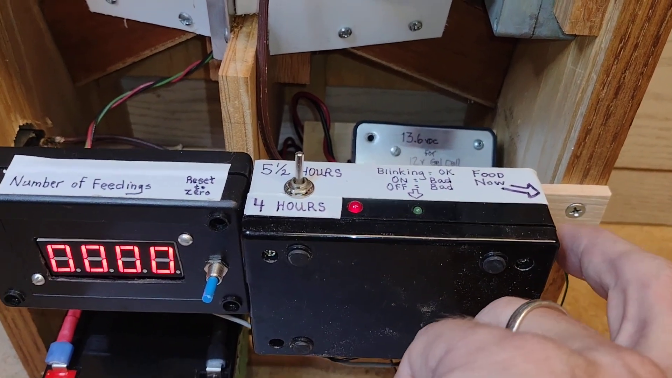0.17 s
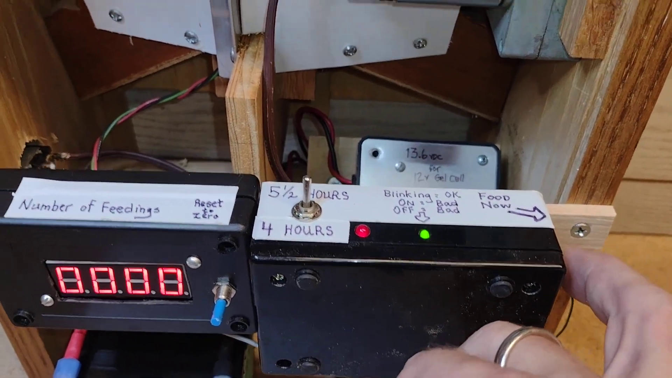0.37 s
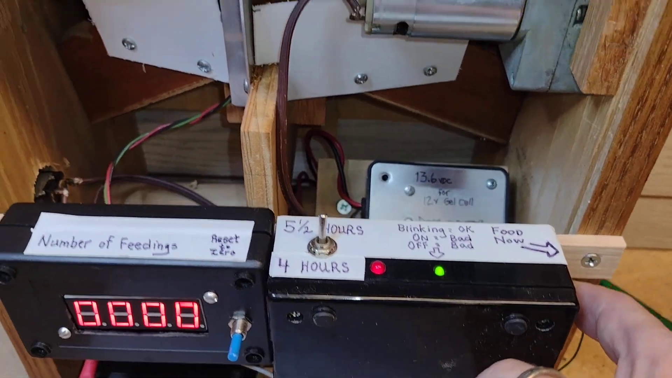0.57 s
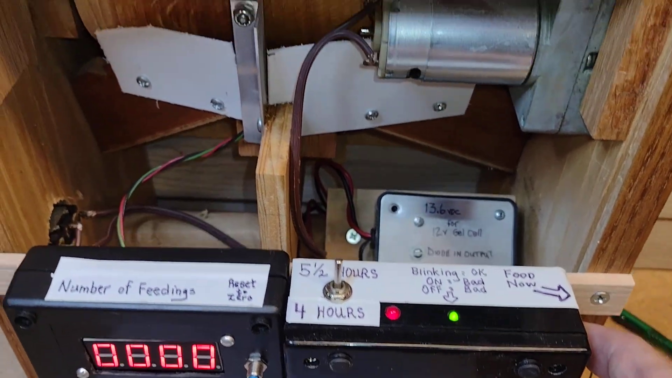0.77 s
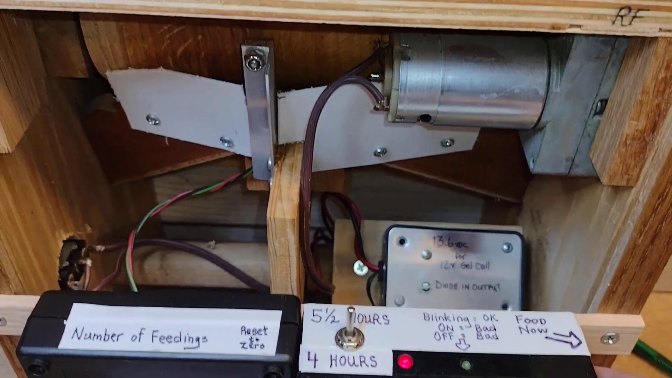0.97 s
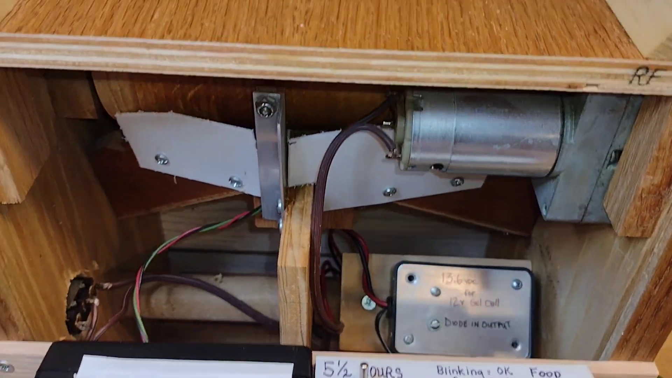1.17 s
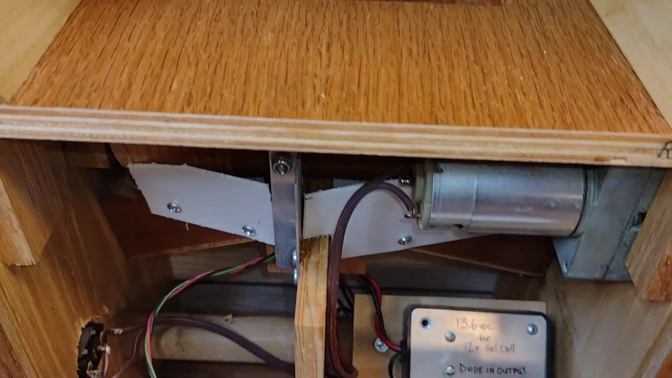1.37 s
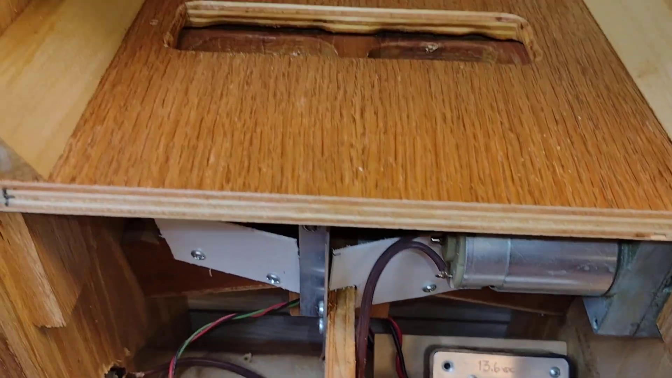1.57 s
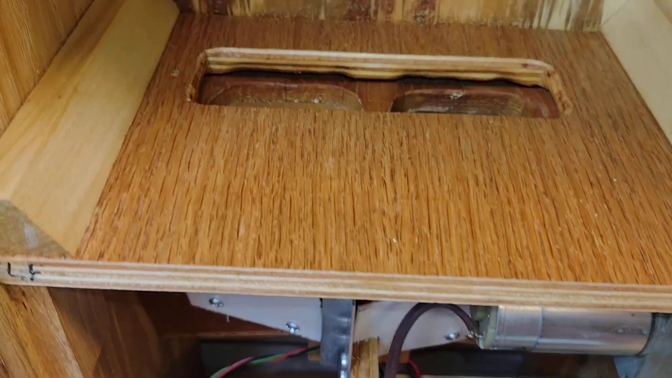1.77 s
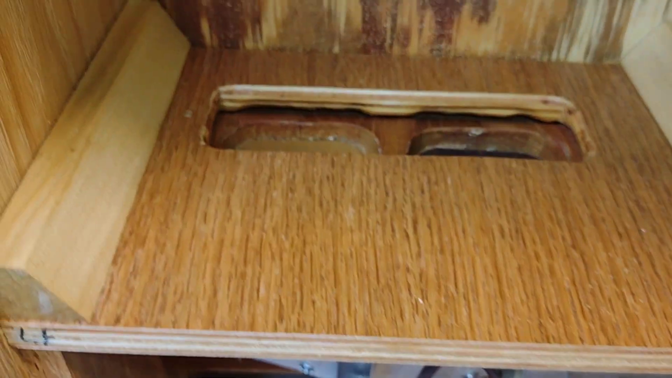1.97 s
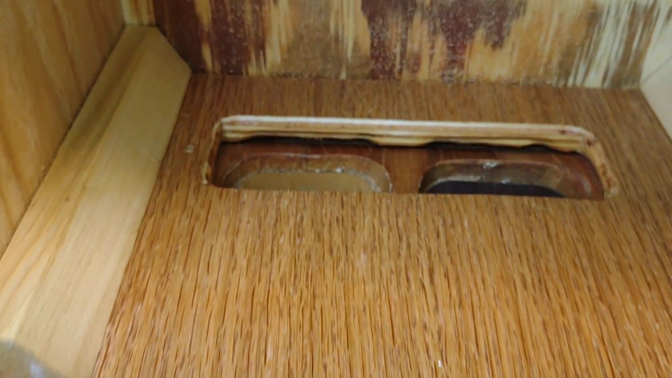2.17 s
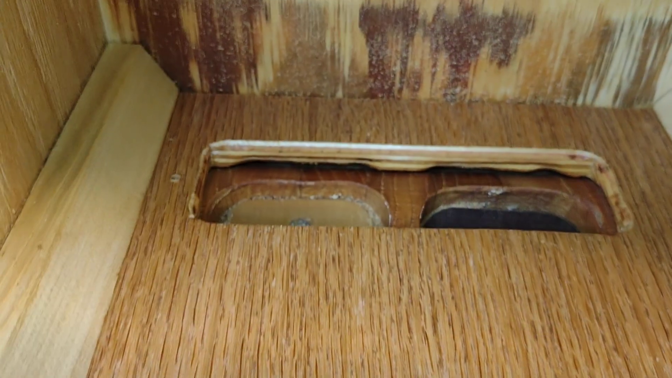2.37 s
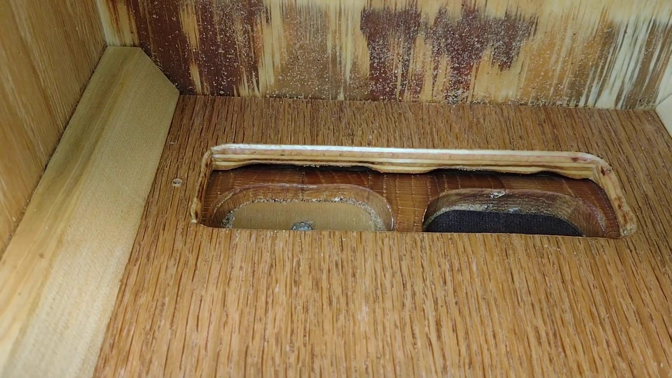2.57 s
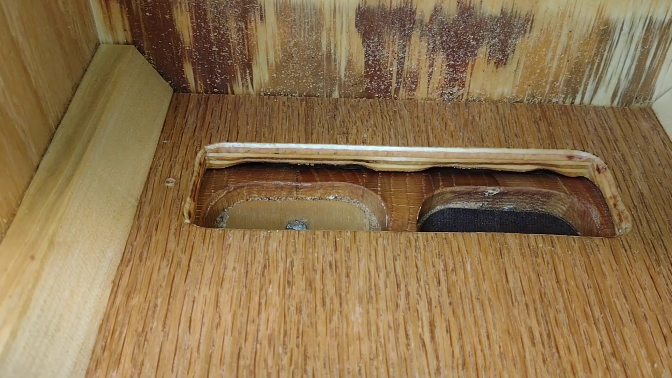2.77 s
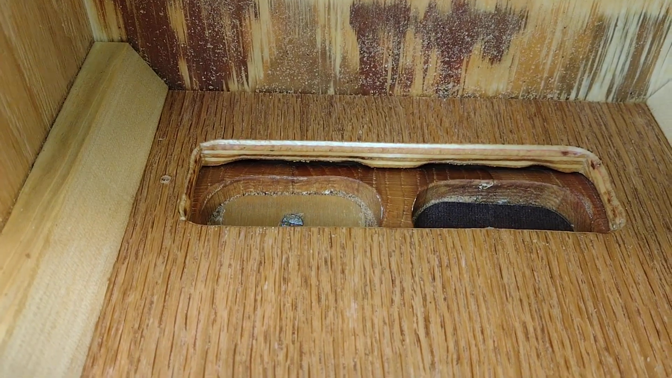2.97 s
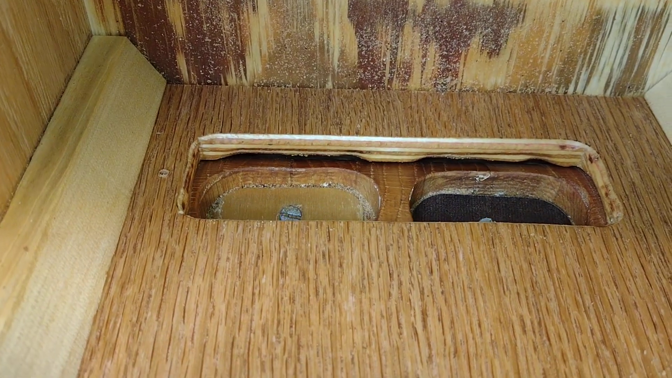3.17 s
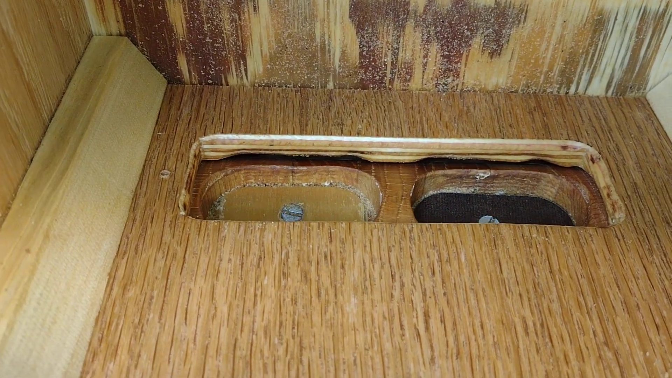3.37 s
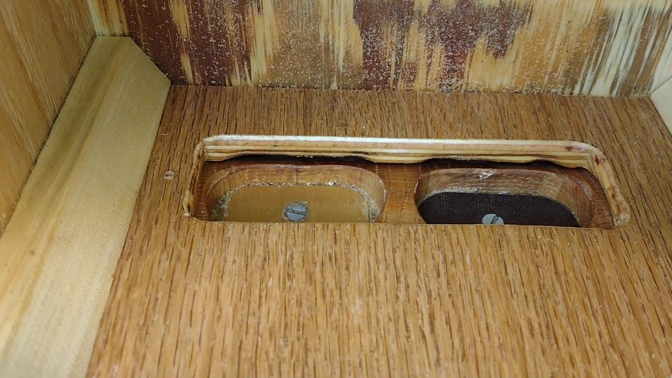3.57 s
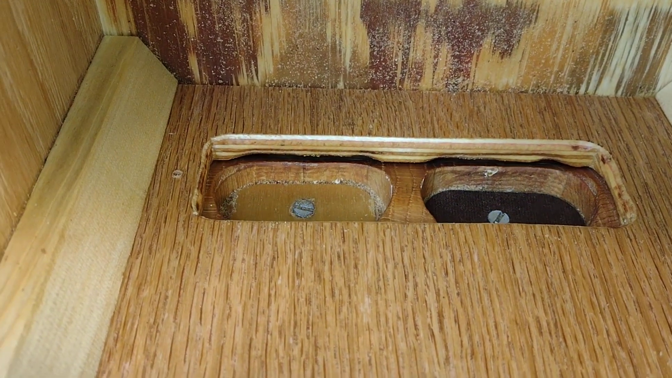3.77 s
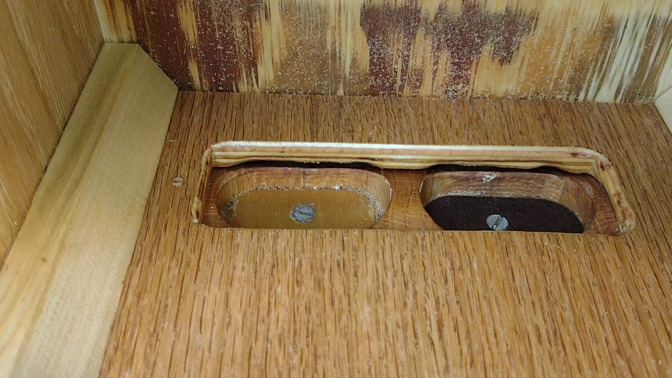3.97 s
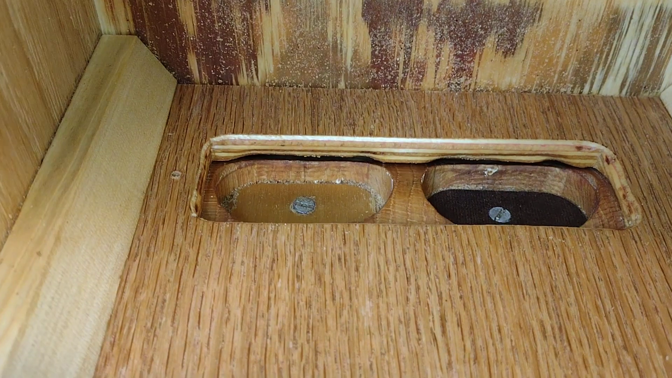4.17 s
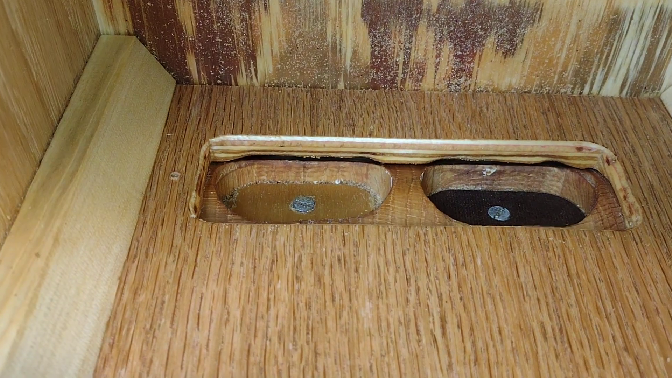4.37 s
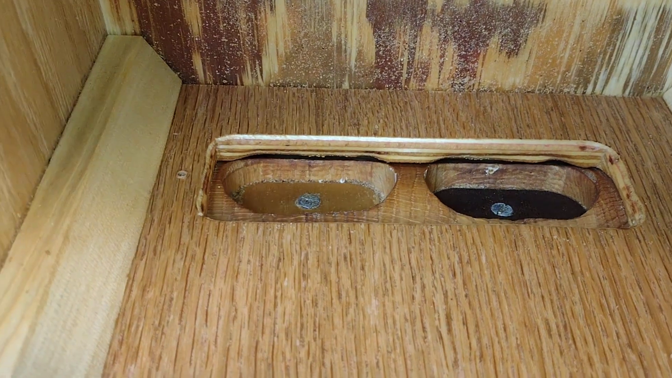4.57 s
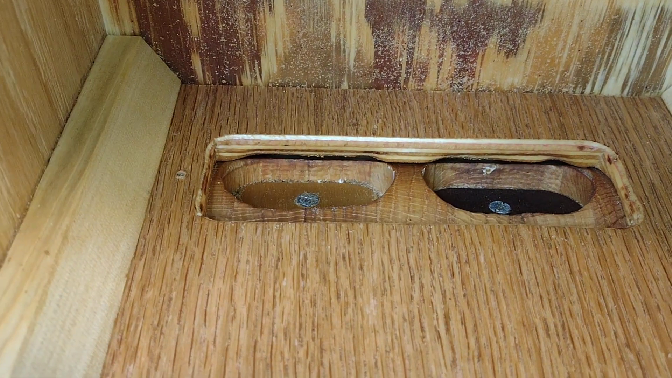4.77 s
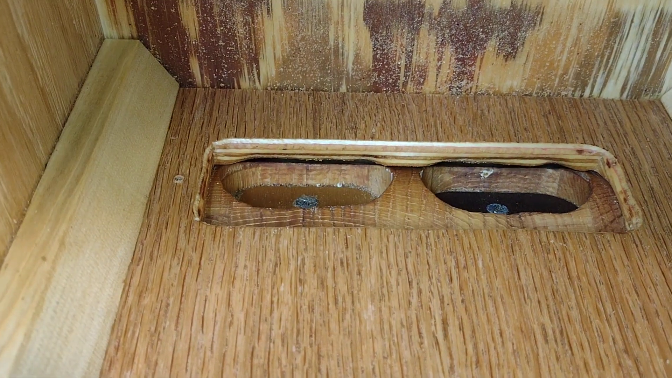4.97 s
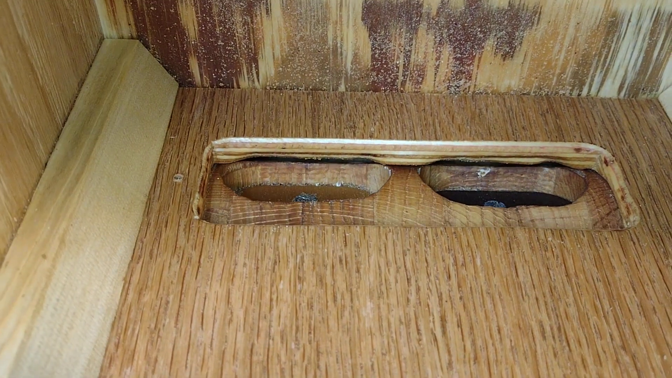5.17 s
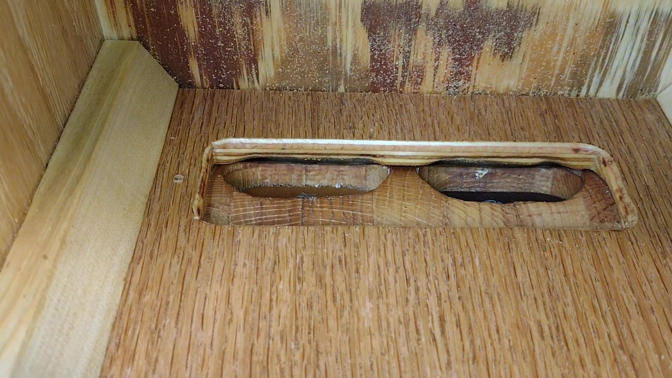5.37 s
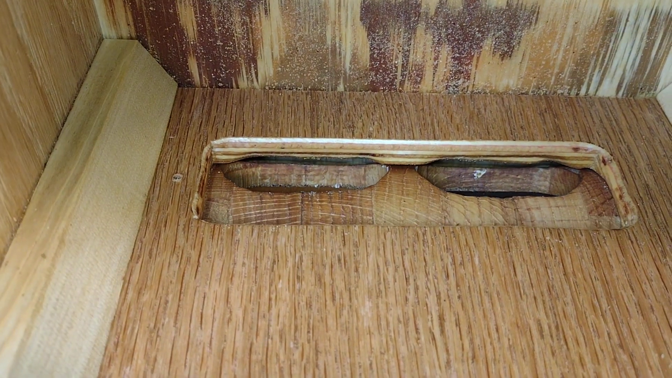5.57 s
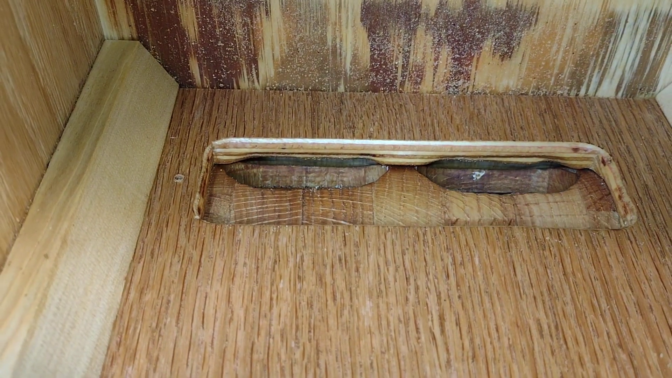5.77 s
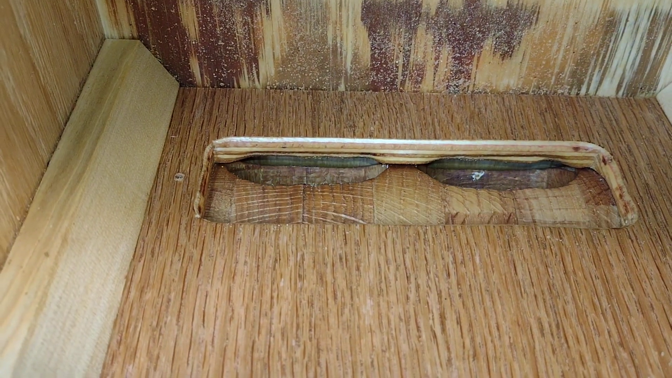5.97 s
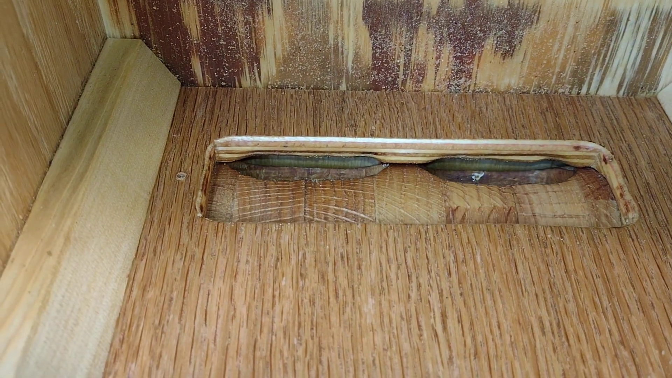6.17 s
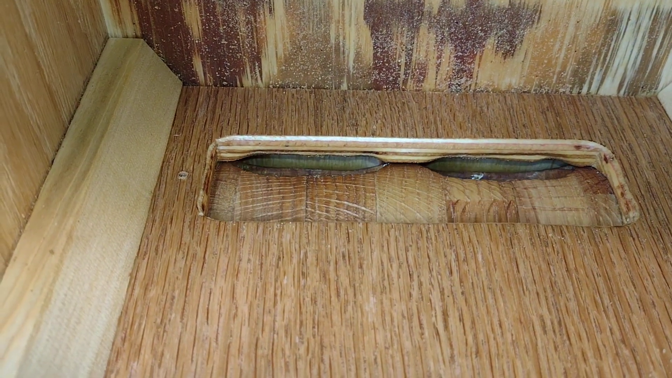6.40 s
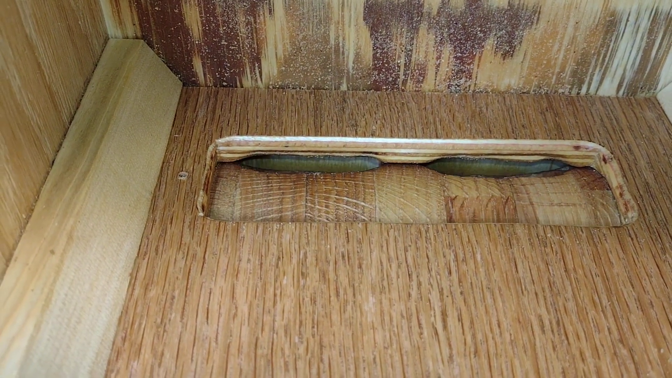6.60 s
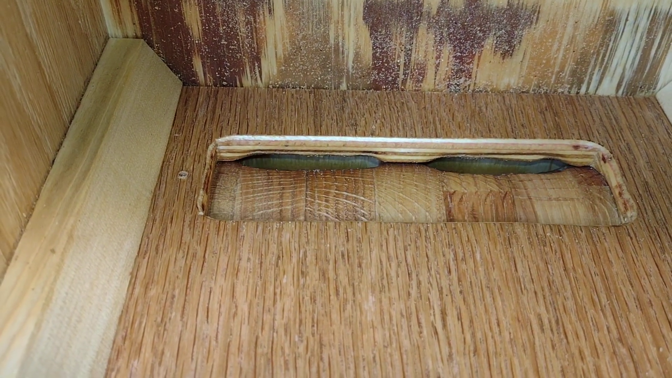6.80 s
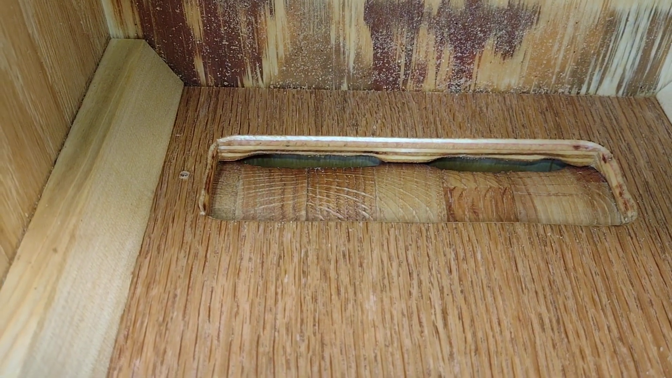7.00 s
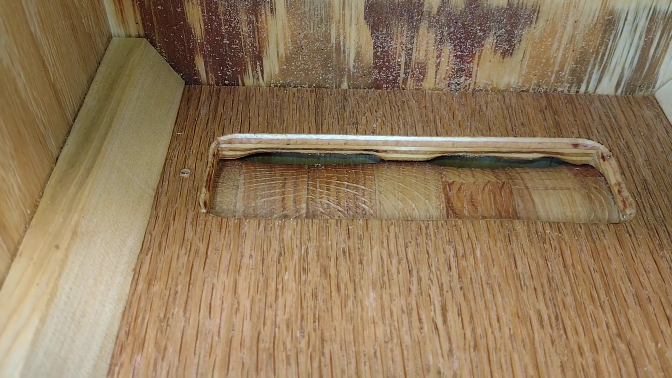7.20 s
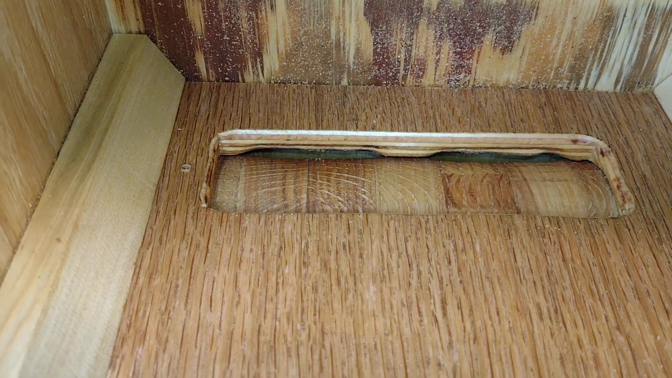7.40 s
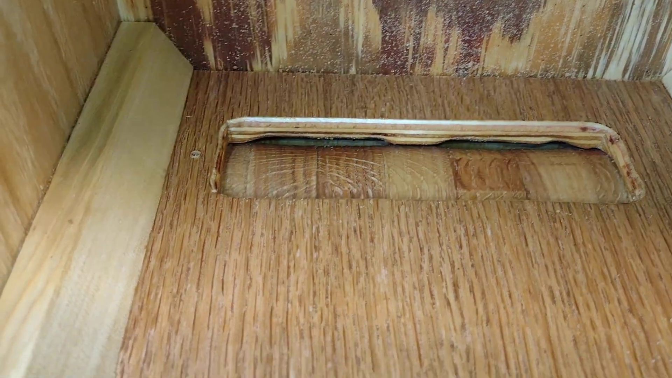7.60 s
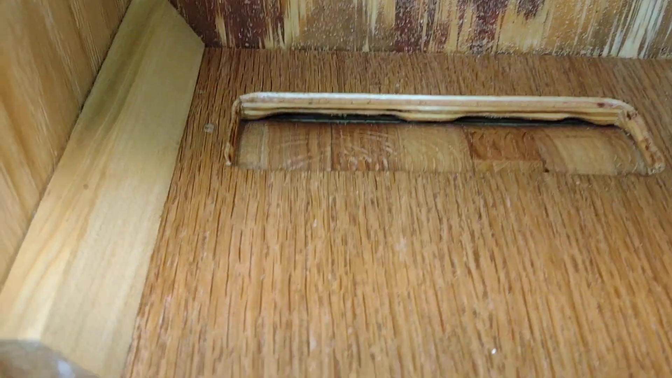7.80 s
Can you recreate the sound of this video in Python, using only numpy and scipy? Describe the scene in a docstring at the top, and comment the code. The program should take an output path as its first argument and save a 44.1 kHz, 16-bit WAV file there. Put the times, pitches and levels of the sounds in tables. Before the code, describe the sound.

In a quiet indoor room with soft air noise and a faint low hum, a plastic button snaps once with a small boxy thump. About two and a half seconds later a small electric gear motor starts suddenly, gains strength within a second, and keeps whirring with rough, buzzing gears and tiny irregular ticks. Heard close, just above the wooden cabinet, in mono with dull top treble.

```python
"""Gear motor in a wooden feeder

A plastic button snaps and thumps its box (decaying sines) in a quiet room of air noise, drone and hum.
A small gear motor then starts and slowly turns a wooden drum. Its eccentric gears whine, mesh and rattle,
ringing cabinet, gear case and teeth; the colour shifts as the drum's pockets turn out of sight."""
import sys
import numpy as np
from scipy import signal
from scipy.fft import rfft, irfft
from scipy.io import wavfile

SR = 44100
rng = np.random.default_rng(int(sys.argv[2]) if len(sys.argv) > 2 else 0)


def store_wav(level_fs):
    """Save 16-bit WAV to argv[1]."""
    pcm = np.round(np.clip(np.atleast_2d(level_fs), -1, 1) * 32767)
    wavfile.write(sys.argv[1], SR, pcm.T.astype(np.int16))


N = 345744
TIME = np.arange(N) / SR
START_S = 2.82  # motor switch-on


def from_db(db):
    """Decibels to gain."""
    return np.exp(np.asarray(db) * (np.log(10) / 20))


def rms_one(x):
    """Scale to unit power."""
    return x / np.sqrt(np.mean(x ** 2) + 1e-20)


def running(x):
    """Silent before the start, unit power afterwards."""
    on = TIME > START_S
    return on * x / np.std(x[on])


def drift(rate_hz):
    """Slow chance with spread 1: noise through two equal low-pass poles, at 1/40 of the sample rate."""
    step = 40
    r = np.exp(-2 * np.pi * rate_hz * step / SR)
    settle = 2000
    noise = rng.standard_normal(N // step + settle + 2)
    slow = signal.lfilter([1], [1, -2 * r, r * r], noise)[settle:]
    return np.interp(np.arange(N) / step, np.arange(len(slow)), rms_one(slow))


def resonate(x, hz, width_hz):
    """A steep-sided resonance: two equal stages, gain 1 on top."""
    r = np.exp(-np.pi * width_hz / SR)
    stage = [(1 - r * r) / 2, 0, (r * r - 1) / 2, 1, -2 * r * np.cos(2 * np.pi * hz / SR), r * r]
    return signal.sosfilt([stage, stage], x + 1e-18)


def ring(x, hz, t60_s):
    """A unit click sets a decaying sine of initial height 1 ringing."""
    r = from_db(-60 / (t60_s * SR))
    w = 2 * np.pi * hz / SR
    return signal.lfilter([0, np.sin(w)], [1, -2 * r * np.cos(w), r * r], x + 1e-18)


def clicks(times_s, sizes):
    """Single impulses at the given times."""
    samples = np.clip(np.round(times_s * SR).astype(int), 0, N - 1)
    return np.bincount(samples, sizes, N)


def blows(rows):
    """Impulses from rows of (start_s, level_db)."""
    start_s, level_db = np.transpose(rows)
    return clicks(start_s, from_db(level_db))


def reflections(x, t60_s, wet_db):
    """Dense early echoes between the plywood walls: a decaying noise tail."""
    t = TIME[:SR // 4]
    tail = rng.standard_normal(len(t)) * from_db(-60 * t / t60_s) * (t > .002)
    return x + from_db(wet_db) * signal.fftconvolve(x, tail / np.linalg.norm(tail))[:N]


# room air spectrum, relative: pitch_hz [Hz], level_db [dB per Hz]
AIR_SPECTRUM = [(25, -32), (60, -11.5), (110, -3), (185, -2), (225, 4), (450, -13.5), (560, -3.5), (660, 0),
                (800, -11), (920, -7), (1130, -15), (1400, -12.5), (1850, -13.5), (2250, -19.5),
                (2700, -22.5), (3000, -25.5), (5000, -29), (7500, -31.5), (8500, -52)]
AIR_DB, DRONE_DB, DRONE_RISE_DB_PER_S = -64.5, -62, 1.4


def room():
    """Soft air noise, a low drone that grows slowly and a hum that swells with it, as of a distant fan."""
    pitch_hz, level_db = np.transpose(AIR_SPECTRUM)
    bins_hz = np.maximum(np.arange(N // 2 + 1) * SR / N, 1)
    shape = from_db(np.interp(np.log(bins_hz), np.log(pitch_hz), level_db))
    air = irfft(rfft(rng.standard_normal(N)) * shape, N)
    drone = rms_one(resonate(rng.standard_normal(N), 317.0, 85))
    hum = np.sin(2 * np.pi * 215.3 * TIME + 0.22 * drift(1.4)) * from_db(0.96 * drift(2.1))
    drone_db = DRONE_DB + DRONE_RISE_DB_PER_S * TIME
    return from_db(AIR_DB) * rms_one(air) + from_db(drone_db) * (drone + from_db(-1.5) * hum)


# button snap and bounces: start_s [s], level_db [dB]
BUTTON_HITS = [(.3370, -30.5), (.3390, -49), (.3466, -49)]
# modes of button and box: pitch_hz [Hz], level_db [dB re hit], t60_s [s]
BUTTON_RING = [(105, -13, 0.059), (318, -14, 0.04), (465, -11.5, 0.032), (1160, -7, 0.0081),
               (2090, -4.5, 0.0089), (2720, -1.5, 0.0073), (3140, -4.5, 0.0061), (4600, -3.5, 0.0053),
               (5500, -5, 0.0051), (6340, -11.5, 0.0063)]


def button():
    """A short plastic snap with a soft thump of the box: each hit rings decaying modes of alternate sign."""
    hits = blows(BUTTON_HITS)
    out = np.zeros(N)
    for k, (pitch_hz, level_db, t60_s) in enumerate(BUTTON_RING):
        out += (-1) ** k * from_db(level_db) * ring(hits, pitch_hz, t60_s)
    return out


KICK_DELAY_S, KICK_DB, KICK_HZ, KICK_T60_S = .008, -41, 320, .06


def kick():
    """The motor's starting torque jerks its mount, which rings briefly."""
    jerk = blows([(START_S + KICK_DELAY_S, KICK_DB)])
    return resonate(ring(jerk, KICK_HZ, KICK_T60_S), KICK_HZ, KICK_HZ)


# teeth taking up play: start_s [s], jolt_db [dB, peak gain on the gears], tick_db [dB, before colouring]
TOOTH_KNOCKS = [(2.839, 5.5, -49), (3.005, 0.5, -50), (3.059, 1.5, -46), (3.275, 0.5, -49),
                (3.325, 2.5, -43), (3.433, 3.5, -50), (3.510, 0.5, -42), (3.670, 0, -37.5), (3.692, 2, -35),
                (3.7254, 1.5, -35), (3.830, 2, -40), (3.960, 3.5, -39), (4.170, 0.5, -44), (4.283, 2, -48),
                (4.336, 2, -51), (4.386, 4.5, -39), (4.396, 3, -42), (4.434, 0.5, -43), (4.627, 0, -41),
                (4.730, 0.5, -39), (4.838, 1.5, -38.5), (4.946, 0.5, -39), (5.072, 1.5, -37),
                (5.180, 3.5, -43), (5.396, 1, -39), (5.428, 2, -48), (5.436, 0, -41), (5.682, -1, -41),
                (5.902, 0, -39), (5.954, 1, -48), (6.106, 2.5, -36), (6.188, 1.5, -39), (6.2953, 1, -36),
                (6.456, 2.5, -44), (6.513, 1, -36), (6.742, 1, -43), (6.798, 2.5, -43), (6.909, 2, -42),
                (6.957, 3, -34.5), (7.016, 3.5, -45), (7.147, 0.5, -45), (7.199, 6.5, -48),
                (7.248, -1.5, -40), (7.356, 2.5, -35), (7.414, -1, -44), (7.465, -0.5, -39),
                (7.519, 2, -43), (7.651, 1.5, -48), (7.756, 3, -41)]
# tooth resonances: pitch_hz [Hz], width_hz [Hz], rising_db, facing_up_db, out_of_sight_db [relative dB]
TOOTH_MODES = [(4450, 300, -69.5, -64.5, -64.3), (4850, 800, -57, -58, -62.5), (5170, 320, -70, -65, -60),
               (5840, 520, -61, -57, -61), (6370, 620, -59.5, -60.5, -59), (6850, 400, -64.5, -65.5, -65),
               (7450, 400, -69, -69.5, -68)]
# drum in its housing: start_s [s], level_db [dB, before filtering]
DRUM_BUMPS = [(4.40, -42)]
FIRST_TICK_DB = -48  # tick at switch-on


def knocks(colour_db=3):
    """Hard tooth contacts ring the teeth, each in its own colour; the drum bumps softly in its housing."""
    start_s, _, tick_db = np.transpose(TOOTH_KNOCKS)
    start_s, tick_db = np.append(START_S, start_s), np.append(FIRST_TICK_DB, tick_db)
    colour = colour_db * rng.standard_normal((len(start_s), len(TOOTH_MODES)))
    sizes = from_db(tick_db[:, None] + colour)
    metal = np.zeros(N)
    for k, (pitch_hz, _, _, facing_up_db, _) in enumerate(TOOTH_MODES):
        ringing = ring(clicks(start_s, sizes[:, k]), pitch_hz, 0.0051)
        metal += (-1) ** k * ringing * from_db(facing_up_db + 59.5)
    thud = resonate(ring(blows(DRUM_BUMPS), 148, 0.15), 145, 120)
    return reflections(metal, t60_s=0.025, wet_db=-7.5) + thud


JOLT_PEAK_S = .003  # knock to peak of its jolt


def jolts():
    """Each knock drives the gears with a changed force for milliseconds: a gain in dB that peaks and decays."""
    start_s, jolt_db, _ = np.transpose(TOOTH_KNOCKS)
    age = TIME[:SR // 10] / JOLT_PEAK_S
    return from_db(signal.fftconvolve(clicks(start_s, jolt_db), age * np.exp(1 - age))[:N])


SPIN_UP_S, PINION_HZ = .03, 37.68  # time constant; turns per second
WHEEL_RATIO, IDLER_RATIO = .475, .525  # turns per pinion turn
WHEEL_RUNOUT_TURNS = .0038  # pinion pushed ahead and behind


def pinion_turns(wobble_turns=.005):
    """Turns since the start: quick spin-up, then a speed the eccentric wheel hurries and holds back."""
    t = np.maximum(TIME - START_S, 0)
    lag = 1 - np.exp(-t / SPIN_UP_S)
    turns = PINION_HZ * (t - SPIN_UP_S * lag) + wobble_turns * lag * drift(1.5)
    runout = WHEEL_RUNOUT_TURNS * np.sin(2 * np.pi * WHEEL_RATIO * turns)
    return np.maximum.accumulate(turns + runout)  # never backwards


# where in its own turn each wheel presses hardest
WHEEL_PEAK_TURNS, IDLER_PEAK_TURNS, IDLER_DB = .63, .16, .55


def tooth_load(turns, pinion_db, wheel_db, uneven_db, pinion_peak_turns=0.23):
    """Eccentric gears press harder once a turn each; pinion and wheel reinforce when they coincide."""
    pinion = np.cos(2 * np.pi * (turns - pinion_peak_turns))
    wheel = np.cos(2 * np.pi * (turns * WHEEL_RATIO - WHEEL_PEAK_TURNS))
    idler = np.cos(2 * np.pi * (turns * IDLER_RATIO - IDLER_PEAK_TURNS))
    gears_db = pinion_db * pinion + wheel_db * wheel * (1 + pinion) + IDLER_DB * idler
    return from_db(gears_db + uneven_db * drift(40))


# drum angle: time_s [s] of pockets rising, facing up, out of sight
DRUM_ANGLE_S = [3.2, 4.5, 7.2]


def by_drum_angle(levels_db):
    """A level that changes as the drum's pockets rise, face up and turn out of sight."""
    return np.interp(TIME, DRUM_ANGLE_S, levels_db)


PINION_TEETH = 9


def tooth_contacts(turns, spots_per_tooth=3):
    """Times at which high spots of the pinion's teeth touch, alike every turn, and which spot each is."""
    spots = PINION_TEETH * spots_per_tooth
    contact = np.arange(spots // 2, int(turns[-1] * spots))
    which = contact % spots
    offset = rng.uniform(-.5, .5, spots)
    return np.interp(contact + offset[which], turns * spots, TIME), which


def chatter(modes, turns, rattle_db, bounces_per_s, spread_db, jitter_s, wander_db, soft_start_db=0):
    """Meshing teeth, each striking in its own way, and loose bounces ring modes that swell and fade
    as the contact shifts."""
    strikes_s, which = tooth_contacts(turns)
    strikes_s = strikes_s + jitter_s * rng.standard_normal(len(strikes_s))
    loose = np.flatnonzero((rng.random(N) < bounces_per_s / SR) & (TIME > START_S))
    sizes = from_db(spread_db * np.minimum(rng.exponential(1, len(loose)), 4))
    # teeth touch softly until the load builds up, which spares the highest modes
    soft = np.exp(-np.maximum(TIME - START_S, 0) / 0.42)
    out = np.zeros(N)
    for pitch_hz, width_hz, *levels_db in modes:
        mesh = clicks(strikes_s, rng.standard_normal(which.max() + 1)[which])
        rattle = clicks(TIME[loose], sizes * rng.standard_normal(len(loose)))
        contact = rms_one(mesh) + from_db(rattle_db) * rms_one(rattle)
        level_db = by_drum_angle(levels_db) + wander_db * drift(2.9)
        level_db = level_db - soft_start_db * soft * (pitch_hz > 3000)
        out += rms_one(resonate(contact, pitch_hz, width_hz)) * from_db(level_db)
    return out


# whine tones: multiple [x pinion speed], rising_db, facing_up_db, out_of_sight_db [relative dB]
WHINE_TONES = [(4, -63, -63.5, -64.5), (5, -60.5, -62.5, -61.5), (6, -62.5, -60.5, -55.5),
               (7, -71, -62.5, -62), (8, -54.5, -54.5, -61.5), (9, -46.5, -45.5, -62.5),
               (10, -43, -43, -52.5), (13, -46.5, -52.5, -46.5), (14, -46, -50, -54),
               (15, -50.5, -48.5, -48.5), (16, -47.5, -49, -45), (17, -53, -47.5, -47),
               (19, -44.5, -38, -40.5), (20, -53.5, -45.5, -44.5), (21, -44.5, -41.5, -49),
               (22, -39.5, -43.5, -41.5), (26, -48, -47.5, -47), (27, -46.5, -48.5, -48),
               (28, -50, -51.5, -57), (32, -49.5, -52, -51.5), (35, -43, -47, -45), (42, -42, -50.5, -47.5),
               (48, -47, -52, -57), (50, -48, -57.5, -40.5), (53, -45.5, -51.5, -53.5),
               (59, -42.5, -57.5, -53)]


def whine(turns, waver_db=1.5, slip_turns=.015):
    """Tones locked to the pinion; they grow with its speed, and waver and slip a little with the load."""
    out = np.zeros(N)
    for multiple, *levels_db in WHINE_TONES:
        phase = 2 * np.pi * (multiple * turns + rng.random() + slip_turns * drift(2.3))
        out += np.sin(phase) * from_db(by_drum_angle(levels_db) + waver_db * drift(1.8))
    return out * np.gradient(turns)


def build_up(full_db, shortfall_db, settle_s):
    """Level in dB that starts low and settles as the drive takes up the drum's load."""
    return full_db - shortfall_db * np.exp(-np.maximum(TIME - START_S, 0) / settle_s)


# build-up under load: full_db [dB], shortfall_db [dB at the start], settle_s [s, time constant]
CABINET_RISE = (-29.5, 12.6, 0.32)
CASE_RISE = (-29.5, 13.5, 0.22)
# ticking treble: time_s [s], level_db [dB, before trim]
TICKING_LEVEL = [(2.88, -60.5), (3.1, -56), (3.4, -54), (3.52, -50.5), (3.61, -57.5), (3.72, -51.5),
                 (4.05, -54), (4.6, -53.5), (4.85, -53), (5.1, -54.5), (5.45, -50), (5.57, -56),
                 (5.8, -50.5), (6.15, -53), (6.35, -53), (6.97, -52), (7.1, -52.5), (7.72, -49.5)]
TICKING_TRIM_DB = -0.33
ATTACK_S, ATTACK_DB = 0.027, 3.5  # swell while the rotor gets going: length, depth
LULL_S, LULL_HALF_S, LULL_DB = 5.34, 1.65, 2  # case rings less for part of the drum's turn


def drive_levels():
    """Levels in dB: cabinet and case have a quick attack and slower build-up; teeth follow their table."""
    attack_db = -ATTACK_DB * np.clip(1 - (TIME - START_S) / ATTACK_S, 0, 1)
    lull_db = -LULL_DB * np.exp(-((TIME - LULL_S) / LULL_HALF_S) ** 2)
    cabinet_db = build_up(*CABINET_RISE) + attack_db
    case_db = build_up(*CASE_RISE) + attack_db + lull_db
    teeth_db = np.interp(TIME, *np.transpose(TICKING_LEVEL)) + TICKING_TRIM_DB
    return cabinet_db, case_db, teeth_db


# cabinet and gear case resonances:
# pitch_hz [Hz], width_hz [Hz], rising_db, facing_up_db, out_of_sight_db [relative dB]
CABINET_MODES = [(142, 100, -57, -63, -63.5), (226, 46, -50.0, -52, -53.5),
                 (348.3, 109, -40.5, -38.5, -45.5), (490, 160, -44.5, -41.5, -40), (578, 52, -44, -44, -38),
                 (710.4, 67, -44, -40, -37.5), (810.5, 72, -38.5, -39, -36),
                 (988.5, 147, -34.5, -38.0, -36.0)]
CASE_MODES = [(1139, 140, -45.5, -38, -55), (1318, 260, -35.5, -37, -40.5),
              (1554, 180, -40.5, -39.5, -36.5), (1724, 55, -41.5, -46, -38), (1835, 180, -35.5, -37, -38.5),
              (2014, 120, -39, -40, -36.5), (2202, 157, -37, -36, -41), (2437, 200, -41, -40, -40),
              (2664, 200, -39.5, -41.3, -41), (2845, 130, -45.5, -45, -45.5), (3042, 90, -46, -50, -50),
              (3236, 200, -48.5, -48, -48), (3370, 130, -53, -51.5, -50), (3580, 220, -51, -50, -51),
              (3870, 230, -56, -56, -52), (4140, 200, -61, -60, -61.5)]
GEAR_PLAY_S = .018


def gear_motor():
    """Whine and chatter through cabinet, gear case and teeth; the drum rumbles faintly."""
    turns, jolt = pinion_turns(), jolts()
    cabinet_db, case_db, teeth_db = drive_levels()

    tones = running(whine(turns) * tooth_load(turns, pinion_db=1.6, wheel_db=.5, uneven_db=.1))

    wood = chatter(CABINET_MODES, turns, rattle_db=15, bounces_per_s=2400, spread_db=1.2,
                   jitter_s=.0003, wander_db=.4)
    wood = running(wood * tooth_load(turns, pinion_db=1.7, wheel_db=.9, uneven_db=.2))

    case = chatter(CASE_MODES, turns, rattle_db=2.5, bounces_per_s=1400, spread_db=1.15,
                   jitter_s=.00003, wander_db=.07, soft_start_db=3.5)
    case_load = tooth_load(turns, pinion_db=1.7, wheel_db=.8, uneven_db=.45, pinion_peak_turns=.09)
    case = running(case * jolt * case_load)

    teeth = chatter(TOOTH_MODES, turns, rattle_db=4, bounces_per_s=1900, spread_db=1.5,
                    jitter_s=.00006, wander_db=1.96)
    teeth_load = tooth_load(turns, pinion_db=1.5, wheel_db=.9, uneven_db=1.5, pinion_peak_turns=-.03)
    teeth = running(teeth * jolt * teeth_load)

    rumble = running(resonate(rng.standard_normal(N), 55, 60))
    cabinet = from_db(-3.1) * wood + from_db(-2.4) * tones + from_db(-46.0) * rumble
    # cabinet and case stay quieter until the play between the teeth is taken up
    slack_db = -10 * (TIME < START_S + GEAR_PLAY_S)
    cabinet = from_db(cabinet_db + slack_db / 2) * cabinet
    case = from_db(case_db + slack_db) * case
    return cabinet + case + from_db(teeth_db) * teeth


def scene():
    """Everything, heard from just above the cabinet, in one channel."""
    return (room() + button() + kick() + knocks() + gear_motor())[None]


CUTOFF_HZ = 8150


def record(dry):
    """The microphone drops the deep bass and, steeply, the treble above the cutoff."""
    thin = signal.sosfilt(signal.butter(2, 45, "high", fs=SR, output="sos"), dry)
    return signal.sosfilt(signal.ellip(10, .2, 80, CUTOFF_HZ, fs=SR, output="sos"), thin)


dry = scene()
out = record(dry)
store_wav(out)
```